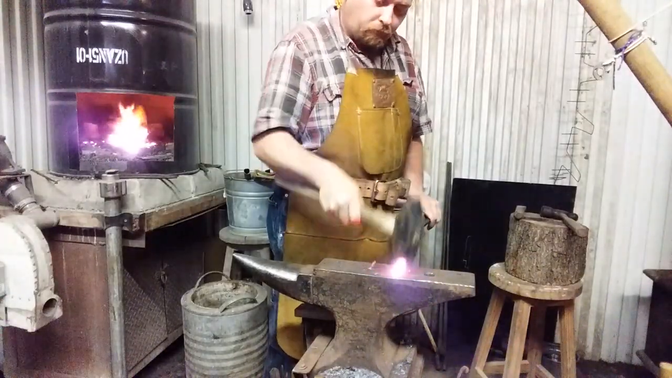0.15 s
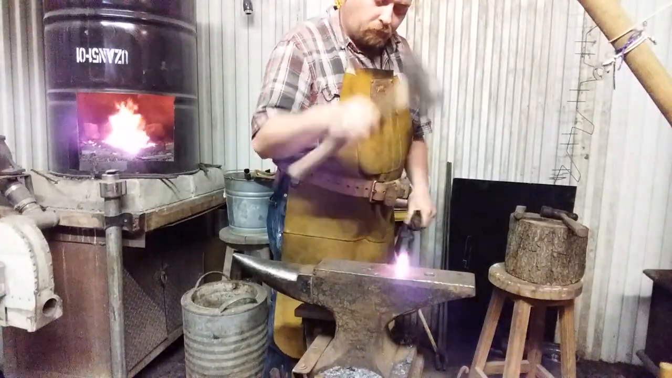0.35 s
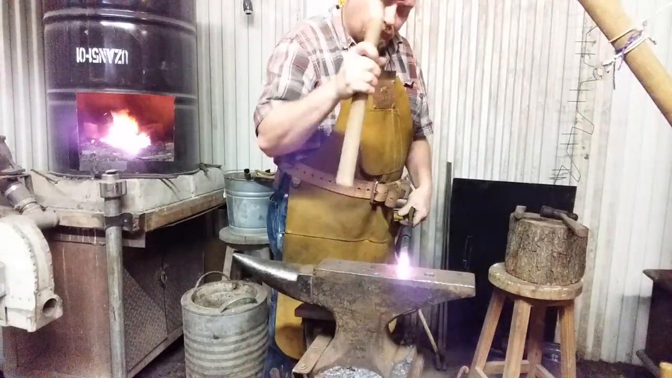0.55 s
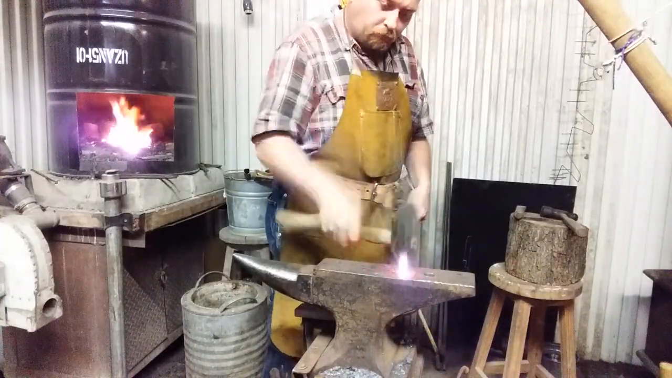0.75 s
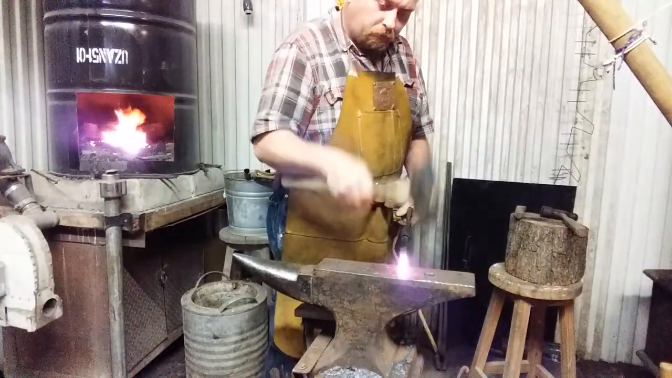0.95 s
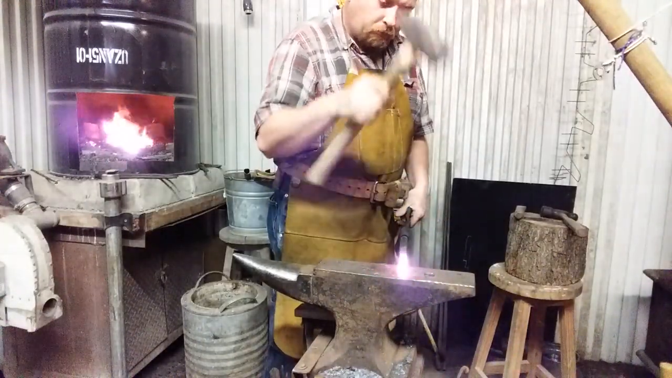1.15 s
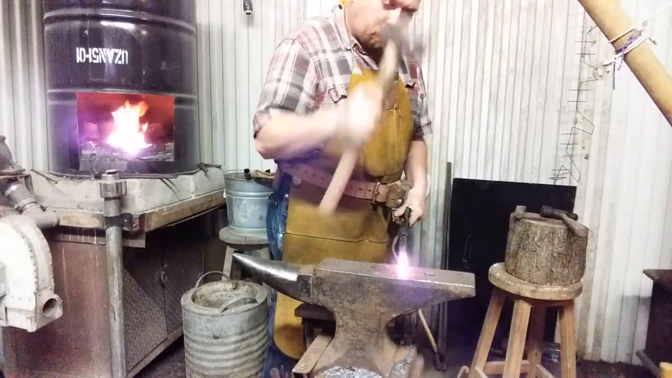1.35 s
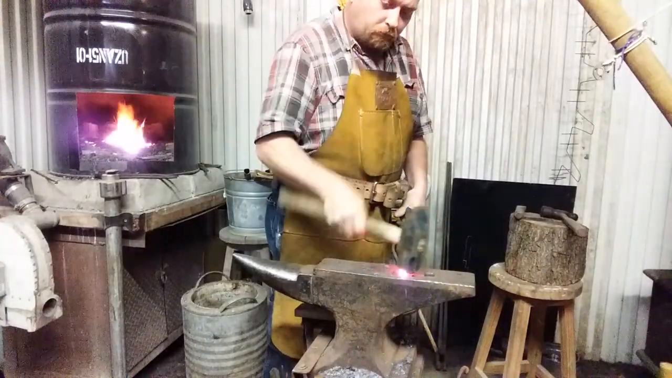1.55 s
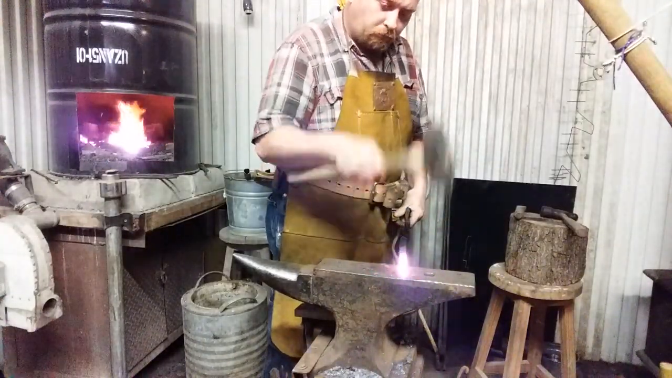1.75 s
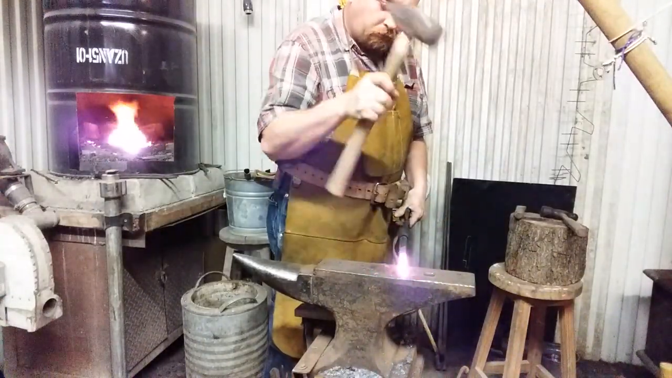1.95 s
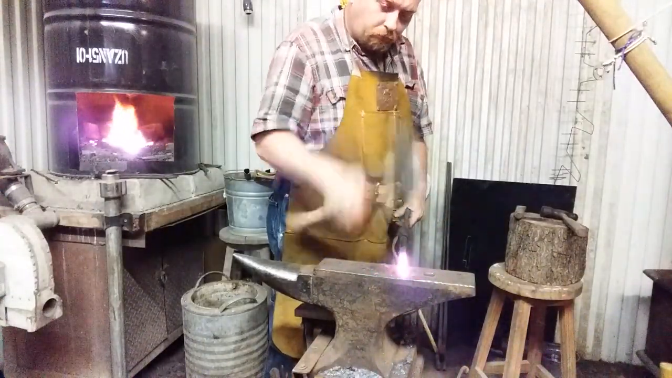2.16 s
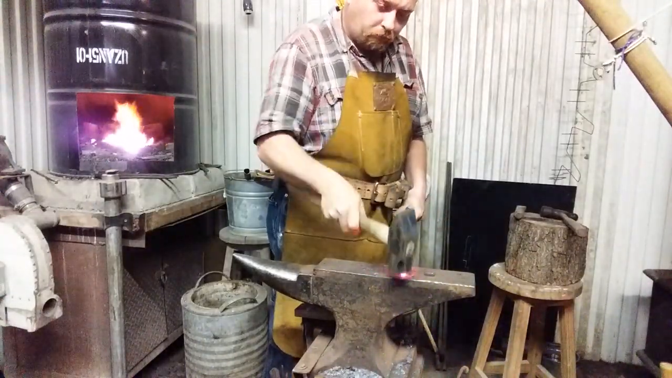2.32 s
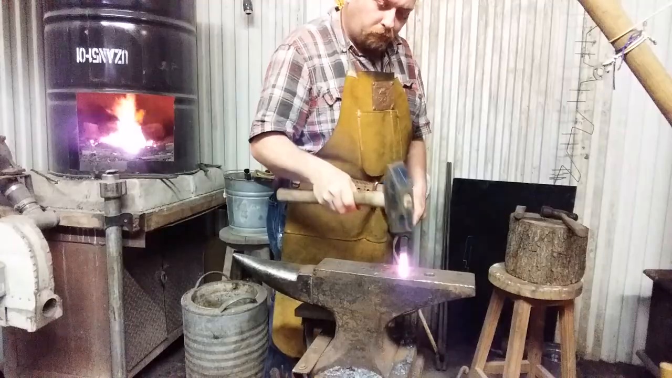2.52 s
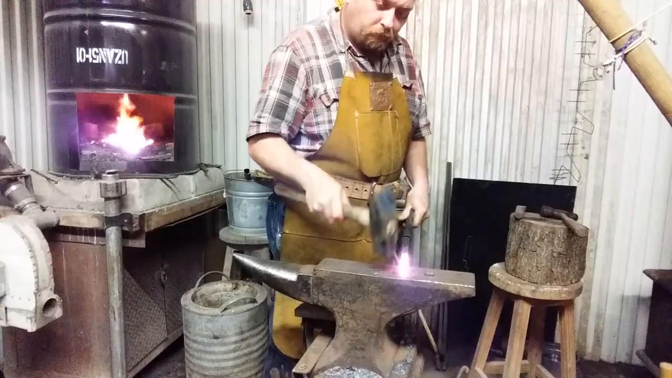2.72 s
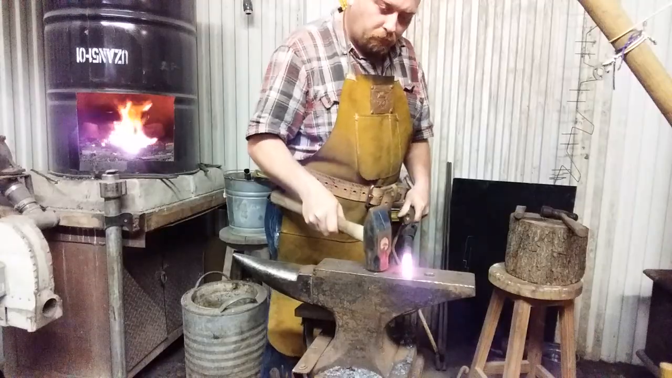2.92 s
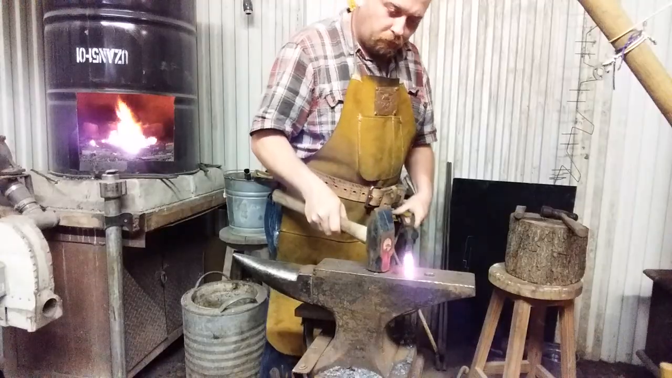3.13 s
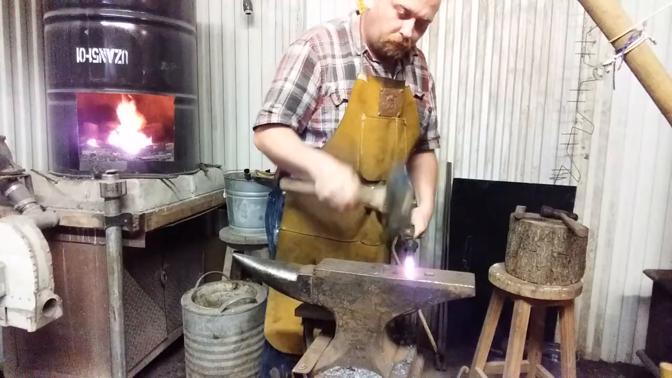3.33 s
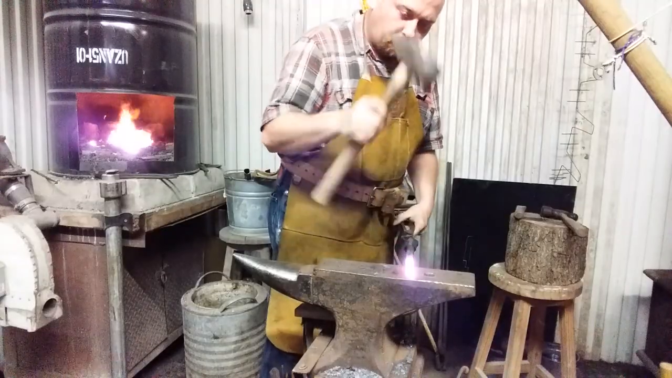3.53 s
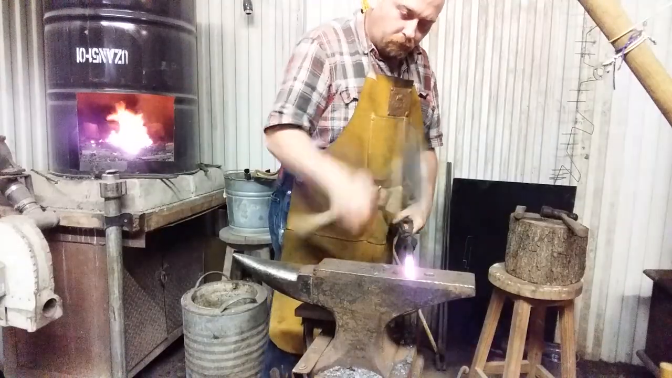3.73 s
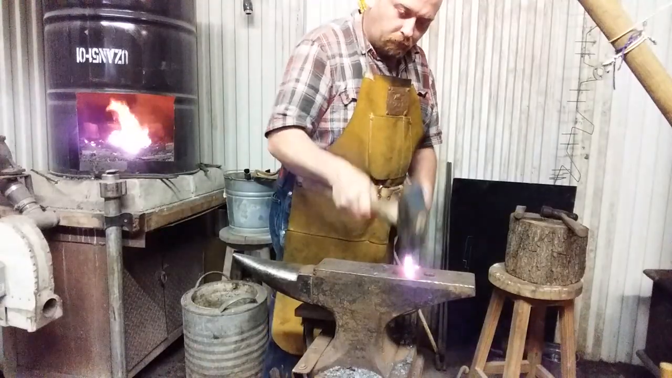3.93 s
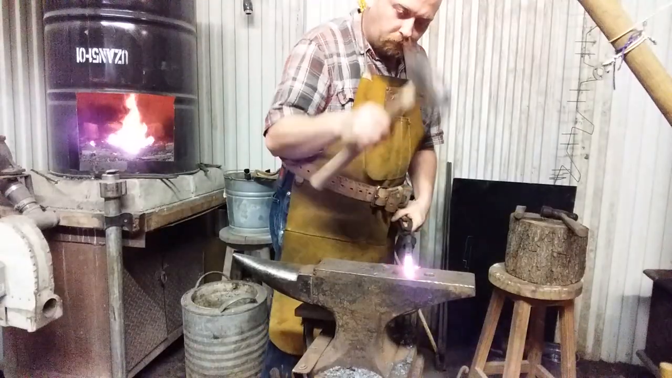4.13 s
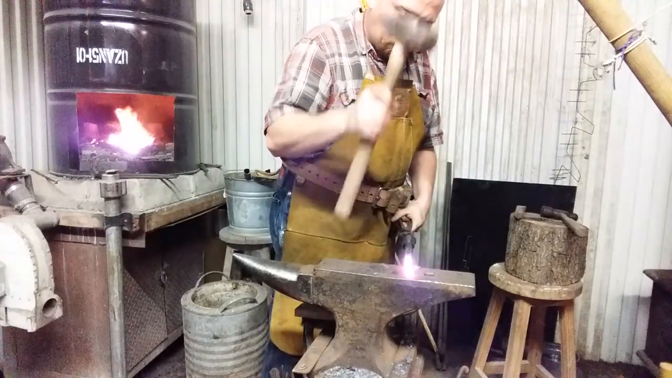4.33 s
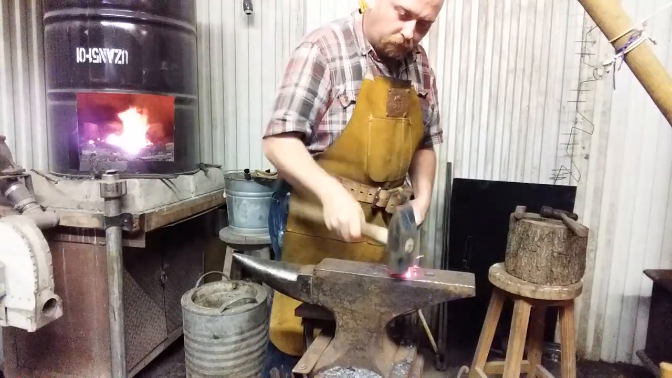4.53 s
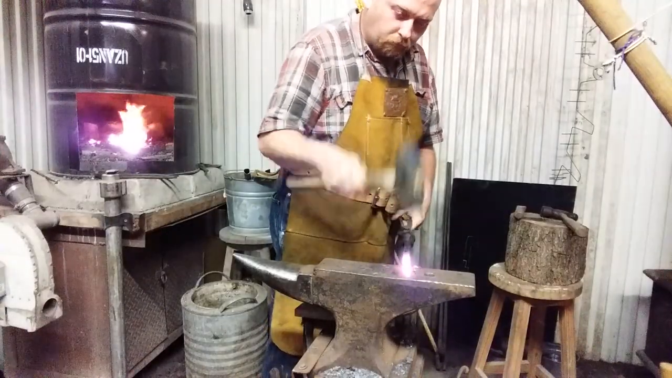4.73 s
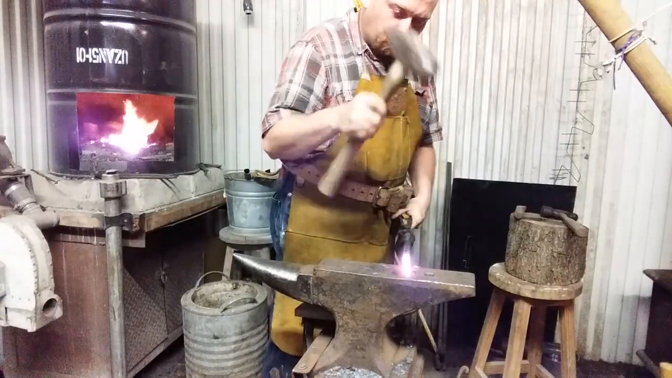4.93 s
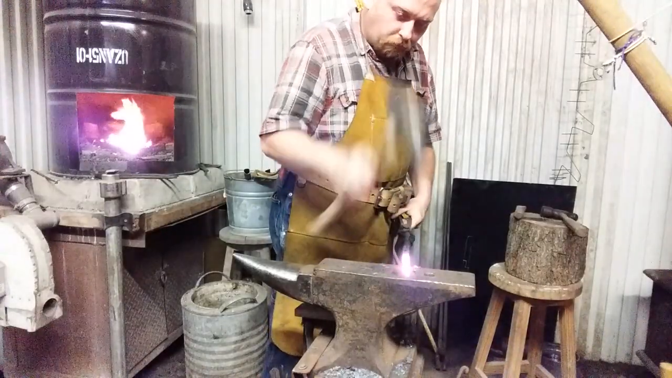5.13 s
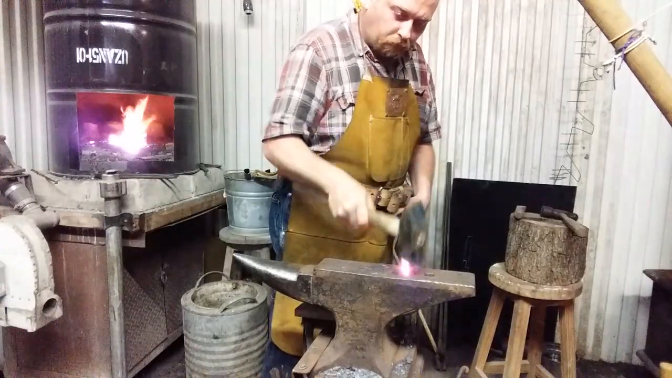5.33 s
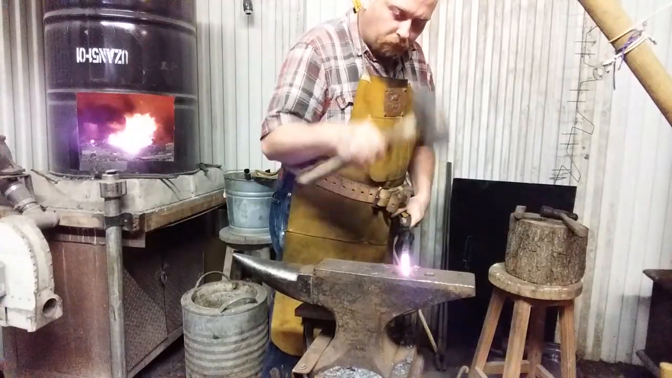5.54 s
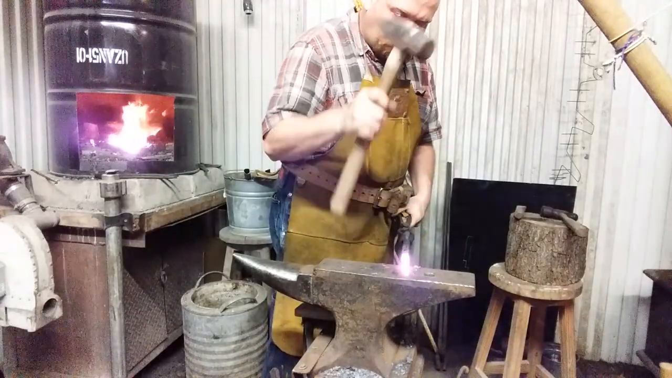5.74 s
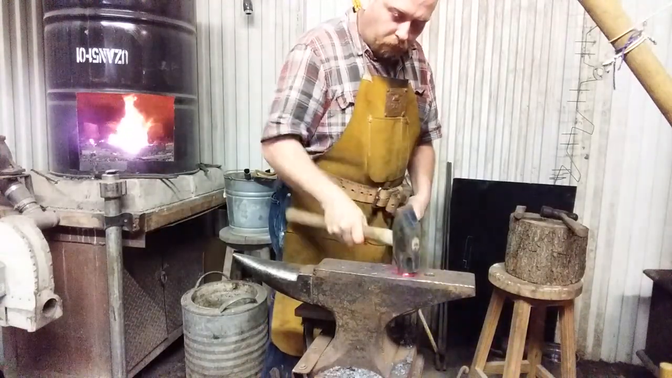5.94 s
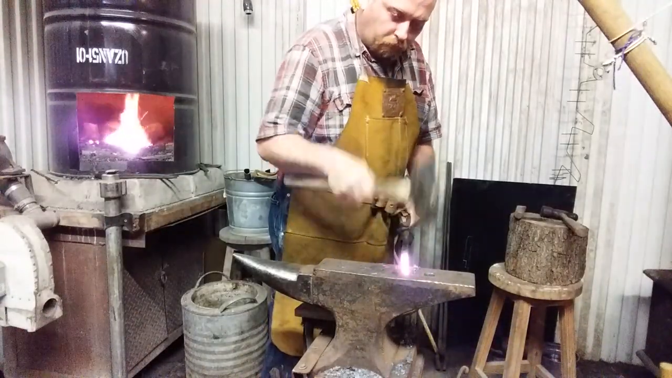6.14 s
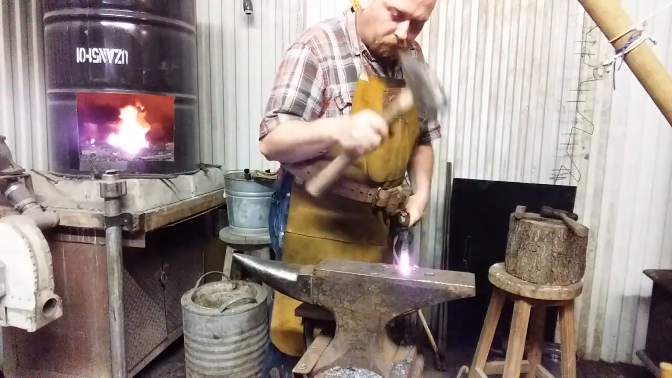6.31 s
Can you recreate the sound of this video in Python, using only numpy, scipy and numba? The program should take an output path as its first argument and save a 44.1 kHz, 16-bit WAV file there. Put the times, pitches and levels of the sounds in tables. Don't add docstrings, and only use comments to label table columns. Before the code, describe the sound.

Thudding, short metallic clangs about every three quarters of a second in a small metal shed, with a brief bouncing hammer tap midway and faint burner noise.

```python
import sys
import numpy as np
from scipy import signal
from scipy.fft import rfft, irfft, next_fast_len
from scipy.io import wavfile
from scipy.ndimage import uniform_filter1d
from numba import njit

SR = 44100
rng = np.random.default_rng(int(sys.argv[2]) if len(sys.argv) > 2 else 0)


def rack_gain(trim_db):
    fader = np.asarray(trim_db, float)
    return 10 ** (fader / 20)


def wav_out(sig):
    wavfile.write(sys.argv[1], SR, np.round(np.clip(np.atleast_2d(sig).T, -1, 1) * 32767).astype(np.int16))


N = 285327

# pitch_hz, level_db (per Hz)
CRACK_SPECTRUM = [(1470, -12), (2500, 2), (2950, 1), (4810, -1), (5460, -6.5), (7200, -3), (9130, -11),
                  (10500, -7), (13400, -6), (15900, -9.5), (16500, -53.5)]


def unit(x):
    return x / np.sqrt(np.mean(x ** 2))


def on_log(table, hz):
    table_hz, value = np.transpose(table)
    return np.interp(np.log(np.maximum(hz, 1)), np.log(table_hz), value)


def band(x, hz, octaves):
    size = x.shape[-1]
    f = np.maximum(np.arange(size // 2 + 1) * SR / size, 1)
    bell = np.exp(-.5 * (np.log2(f / hz) / octaves) ** 2)
    return irfft(rfft(x) * bell, size)


def spread(mid, side, hz):
    # pitch_hz, level_db
    side_levels = [(60, -22.5), (110, -22.5), (200, -13.5), (380, -8), (700, -3), (1290, 6.5), (2380, -1),
                   (4400, -2), (8120, 1), (15000, 1)]
    return mid + rack_gain(on_log(side_levels, hz)) * side * np.array([[1], [-1]])


def decay(t, t60):
    return np.exp(-np.log(1000) * t / t60)


def ring(modes, phase, size):
    t = np.arange(size) / SR
    return sum(rack_gain(db) * decay(t, t60) * np.sin(2 * np.pi * hz * t + p)
               for (hz, db, t60), p in zip(modes, phase))


def add(track, sound, s):
    i = int(s * SR)
    track[..., i:i + sound.shape[-1]] += sound[..., :N - i]


def echo(sound, pattern):
    return signal.fftconvolve(sound[None], pattern, axes=1)


def walk(rate):
    hold = int(SR / rate)
    steps = np.repeat(rng.standard_normal(N // hold + 1), hold)
    return 1.3 * uniform_filter1d(uniform_filter1d(steps, hold), hold)[:N]


def forge():
    # pitch_hz, level_db (per Hz)
    fire_spectrum = [(18, -62), (30, -16.5), (70, -0.5), (124, 2), (153, -9), (364, -1), (449, -8),
                     (499, -3.5), (684, -11.5), (2830, -22.5), (3490, -37.5), (7270, -38), (10500, -54.5),
                     (14000, -45.5), (16000, -60)]
    # start_s, level_db
    background_levels = [(0.0, -46), (0.47, -45.5), (1.1, -46), (2.03, -47.5), (2.54, -45), (2.97, -46), (3.33, -45),
                         (3.78, -40), (3.95, -47.5), (4.219, -50.5), (4.679, -52), (4.9, -47.5), (5.58, -46.5),
                         (5.8, -46.5), (6.47, -47.5)]
    blower_pitches = [118, 7550, 14000]
    blower_levels = [-63, -89, -99]
    usual_rumble_db, usual_hiss_db, hiss_per_rumble = -47, -59.5, 0.9
    rumble_db = np.interp(np.arange(N) / SR, *np.transpose(background_levels))
    hiss_db = usual_hiss_db + hiss_per_rumble * (rumble_db - usual_rumble_db)
    rumble, hiss, swell = 0, 0, walk(6)
    for hz in 35 * 2 ** np.arange(0, 9, .5):
        mid, side = band(rng.standard_normal((2, next_fast_len(N, True))), hz, 0.29)[:, :N]
        level_db = on_log(fire_spectrum, hz) + 1.0 * swell + 0.5 * walk(18)
        part = rack_gain(level_db) * spread(mid, side, hz)
        hiss_share = np.clip(np.log2(hz / 700) / 1.1, 0, 1)
        rumble = rumble + (1 - hiss_share) * part
        hiss = hiss + hiss_share * part
    hum = 0
    for hz, db in zip(blower_pitches, blower_levels):
        level = rack_gain(db + 4 * walk(32))
        turns = np.cumsum(1 + 0.0054 * walk(3.2)) / SR
        hum = hum + level * np.sin(2 * np.pi * hz * turns)
    return unit(rumble) * rack_gain(rumble_db) + unit(hiss) * rack_gain(hiss_db) + hum


def shed(direct_db, size=16384):
    # pitch_hz, t60_s
    shed_t60 = [(100, 0.82), (400, 0.27), (1100, 0.28), (3000, 0.3), (8000, 0.31), (15000, 0.26)]
    t, out = np.arange(size) / SR, 0
    noise = rng.standard_normal((2, size))
    for hz in 60 * 2 ** np.arange(9):
        mid, side = band(noise, hz, 0.75)
        out = out + spread(mid, side, hz) * decay(t, on_log(shed_t60, hz))
    out = out * (1 - np.exp(-t / 0.0014))
    out = out / np.sqrt(np.sum(out ** 2) / 2)
    out[:, 0] += rack_gain(direct_db)
    return out


def slap():
    t = np.arange(-40, 120) / SR - .00016
    return -np.cos(2 * np.pi * 1150 * t + 1.15) * np.exp(-.5 * (t / .00042) ** 2)


def boom(size=24576):
    mode_pitches = [92, 114, 190, 214, 275, 339, 370, 403, 461, 545, 585, 630, 660, 760]
    # level_db, t60_s
    mode_levels = [(-17.5, 0.17), (-12, 0.26), (-9, 0.22), (5, 0.15), (-7.5, .3), (-5.5, 0.32),
                   (-20.5, 0.5), (8.5, 0.12), (-4, 0.18), (-2, .25), (1, 0.21), (2, 0.15), (4, 0.06),
                   (-0.5, 0.18)]
    t, out = np.arange(size) / SR, 0
    for hz, (db, t60) in zip(mode_pitches, mode_levels):
        phase, split = rng.uniform(0, 2 * np.pi, 2), rng.choice([-1, 1], 2)
        pair = [(hz, db, t60), (hz + 14 * split[0], db - 6, t60)]
        mid = ring(pair, phase, size)
        side = ring(pair, phase + split[1] * np.pi / 2, size)
        out = out + spread(mid, side, hz)
    out = out * (1 - np.exp(-t / 0.0043))
    return out / np.sqrt(np.mean(out[:, :2048] ** 2))


def click(spectrum, size=1024):
    log_gain = on_log(spectrum, np.arange(size // 2 + 1) * SR / size) * np.log(10) / 20
    cepstrum = irfft(log_gain, size)
    cepstrum[1:size // 2] *= 2
    cepstrum[size // 2 + 1:] = 0
    pulse = irfft(np.exp(rfft(cepstrum)), size)
    return pulse / np.sqrt(np.sum(pulse ** 2))


def clang(peaks, chance):
    contact_s = 0.0002
    modes = [(hz, db + 1.3 * c, np.log(1000) / (np.pi * width))
             for (hz, width, db), c in zip(peaks, chance[0])]
    onset = 1 - np.exp(-(np.arange(4096) / (contact_s * SR)) ** 2)
    sound = ring(modes, 1.77 * chance[1], size=4096) * onset
    return sound / np.sqrt(np.sum(sound ** 2))


def sing(levels_db, sheet_db, size=24576):
    # pitch_hz, t60_s
    head_modes = [(10379, .46), (11752, .5), (12952, .2), (10890, .2)]
    # pitch_hz, level_db, t60_s
    sheet_modes = [(1632, 2, 0.42), (1586, -4, 0.22), (1680, -1, 0.36), (1733, -3, 0.26), (1546, -7, 0.22),
                   (2650, -6, 0.3)]
    head = []
    for (hz, t60), db in zip(head_modes, levels_db):
        head += [(hz, db, t60), (hz + 6, db - 8, t60)]
    phase, lag = rng.uniform(0, 2 * np.pi, (2, 16))
    ears = [ring(head, p, size) + rack_gain(sheet_db) * ring(sheet_modes, p[8:], size)
            for p in (phase, phase + 0.17 * lag)]
    return np.array(ears) * (1 - np.exp(-np.arange(size) / (.012 * SR)))


def strike(clang_db, crack_db, song_db):
    glance = max(-16 - clang_db, 0)
    slap_db = -3 - .9 * glance
    sheet_db = -27.5 - 3.4 * glance

    def tone(base_db, share, swing):
        return base_db + share * np.clip(swing, -5, 6)

    head_db = (song_db, tone(-58, .4, song_db + 42), tone(-47, 2.6, crack_db + 28),
               tone(-42, 2.5, clang_db + 17))
    return slap_db, sheet_db, head_db


def blows():
    blow_starts = [0.04285, 0.7993, 1.5127, 2.22645, 3.7978, 4.5223, 5.23755, 5.9444]
    # thud_db, clang_db, crack_db, song_db
    blow_levels = [
        (-14.5, -18, -25.5, -41),
        (-13.5, -17.5, -23.5, -34.5),
        (-15, -14.5, -22.5, -42),
        (-15, -14.5, -23, -30),
        (-15, -18.5, -21, -39.5),
        (-16.5, -25.5, -30.5, -50),
        (-13.5, -15.5, -22.5, -50),
        (-15.5, -15, -24, -46),
    ]
    # pitch_hz, level_db (per Hz)
    thud_spectrum = [(80, -21.5), (200, -2.5), (450, -2.5), (900, 4), (1400, -15.5), (3000, -36)]
    # pitch_hz, width_hz, level_db
    anvil_modes = [(1260, 340, 0.5), (1630, 388, 7.5), (2130, 360, -5.5), (2687, 506, 2.5),
                   (4220, 500, -12.5)]
    out, from_anvil = np.zeros((2, N)), shed(-19.5)
    room = boom()
    thud = echo(rack_gain(28.5) * click(thud_spectrum), from_anvil)
    low = room + np.pad(thud, ((0, 0), (0, 8192)))[:, :24576]
    for s, (thud_db, clang_db, crack_db, song_db) in zip(blow_starts, blow_levels):
        slap_db, sheet_db, head_db = strike(clang_db, crack_db, song_db)
        chance, from_spot = rng.standard_normal((2, 16)), shed(-14.5)
        add(out, rack_gain(slap_db) * slap(), s - 40 / SR)
        shift = sum(np.tanh(c) * band(low, hz, .4) for hz, c in zip((200, 400, 800), chance[0, -3:]))
        add(out, rack_gain(thud_db - 1.0) * (low + .2 * shift), s)
        clang_pattern = 0.65 * from_anvil + 0.56 * from_spot
        add(out, echo(rack_gain(clang_db + 34.5) * clang(anvil_modes, chance), clang_pattern), s)
        add(out, echo(rack_gain(crack_db + 35) * click(CRACK_SPECTRUM), from_spot), s)
        add(out, sing(head_db, sheet_db), s)
    rebound_s = 3.821
    add(out, rack_gain(-17.5) * low, rebound_s)
    rebound_crack = click([(3000, -16.5), (9000, -6), (13000, 2.5), (15900, -4.5), (16500, -51.5)])
    add(out, echo(rack_gain(7) * rebound_crack, from_anvil), rebound_s)
    return out


def ticks():
    # start_s, level_db, pitch_hz
    tick_events = [(2.059, -73.5, 4920), (2.203, -60, 1470), (3.207, -65, 12700), (3.21, -57, 2970),
                   (3.378, -70, 6500), (3.54, -64, 12170), (3.545, -58.5, 6500), (3.709, -61.5, 6500),
                   (4.803, -66, 6200), (4.970, -63, 4000), (5.803, -58, 3400), (5.895, -62, 3120)]
    out, pattern = np.zeros((2, N)), shed(-9)
    for s, db, hz in tick_events:
        tick = click([(hz / 3, -20), (hz, 0), (hz * 2.4, -16), (hz * 5, -45)])
        add(out, echo(rack_gain(db + 21.0) * tick, pattern), s)
    return out


def taps():
    # start_s, knock_db, chime_db, tick_db
    tap_events = [
        (2.861, -32, -28, -30.5),
        (2.968, -34, -35.5, -46),
        (3.014, -39, -44, -69),
        (3.048, -43.5, -78, -70),
    ]
    # pitch_hz, width_hz, level_db
    face_modes = [(845, 120, -3), (1260, 235, 5), (1913, 214, 9.5), (2440, 146, -0.5), (2780, 100, -9),
                  (3880, 140, -8.5), (4840, 530, -10.5), (5800, 240, -15.5), (6700, 500, -12),
                  (9480, 180, -24), (13100, 200, -32.5)]
    out = np.zeros((2, N))
    for s, knock_db, chime_db, tick_db in tap_events:
        chance, pattern = rng.standard_normal((2, 16)), shed(-10.0)
        pattern = pattern * (1 + 0.94 * np.exp(-np.arange(16384) / (0.036 * SR)))
        knock = click([(120, -26), (280, 5.5), (500, 5.5), (800, 0), (2000, -41.5)])
        add(out, echo(rack_gain(knock_db + 28.5) * knock, pattern), s)
        add(out, echo(rack_gain(chime_db + 31) * clang(face_modes, chance), pattern), s)
        add(out, echo(rack_gain(tick_db + 14.0) * click(CRACK_SPECTRUM), pattern), s)
    return out


def scene():
    return (blows() + taps() + ticks() + forge()) * rack_gain([[-0.25], [0.25]])


@njit
def squeeze(x, top, slope, attack, release):
    gain, envelope = np.ones(len(x)), 0.
    for i in range(len(x)):
        envelope += (x[i] - envelope) * (attack if x[i] > envelope else release)
        if envelope > top:
            gain[i] = (top / envelope) ** slope
    return gain


def top_cut(x):
    return signal.sosfilt(signal.butter(12, 16650, fs=SR, output="sos"), x)


def record(dry):
    x = signal.sosfilt(signal.butter(4, 55, "high", fs=SR, output="sos"), dry)
    peaks = np.abs(x).max(axis=0)
    x = x * squeeze(peaks, rack_gain(-6.0), 0.78, 1 / (.0006 * SR), 1 / (0.013 * SR))
    x = 1.371 * np.tanh(x / 1.17)
    x = signal.sosfilt(signal.butter(10, 15900, fs=SR, output="sos"), x)
    x = signal.sosfilt(signal.butter(2, 45, "high", fs=SR, output="sos"), x)
    return top_cut(x)


dry = scene()
out = record(dry)
wav_out(out)
```